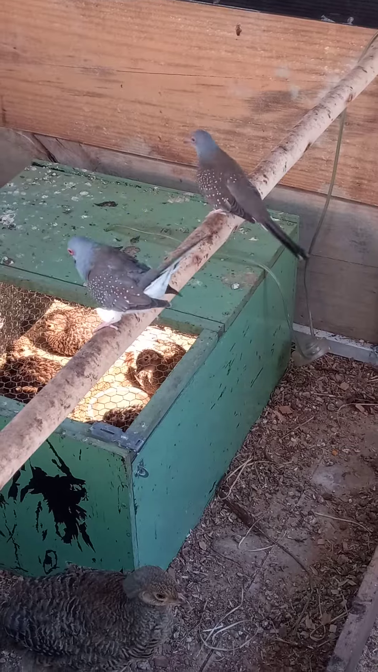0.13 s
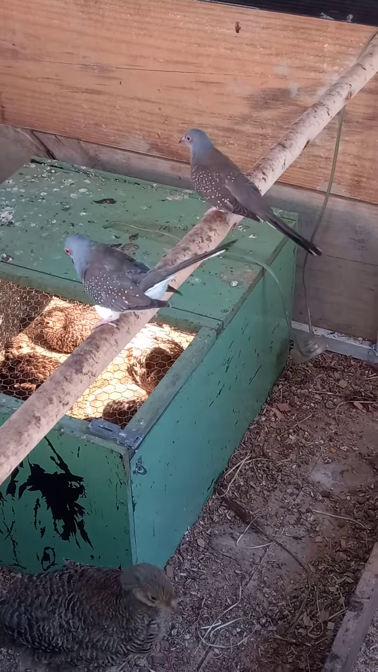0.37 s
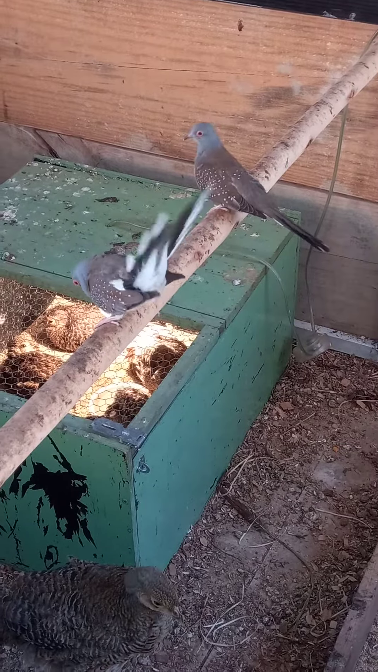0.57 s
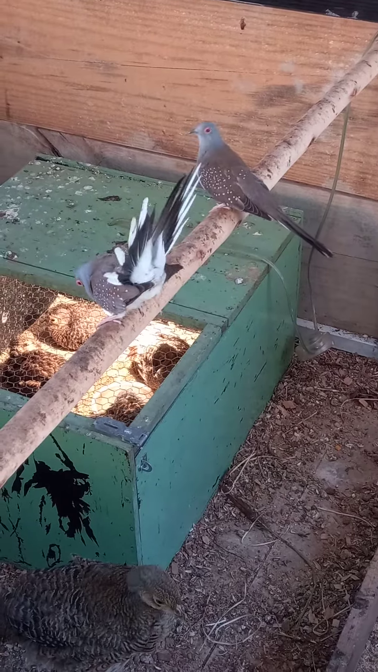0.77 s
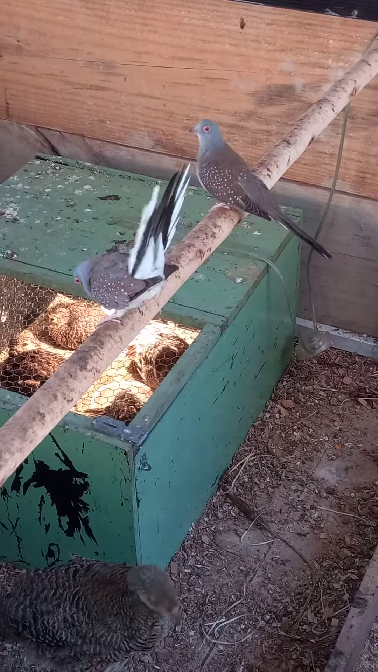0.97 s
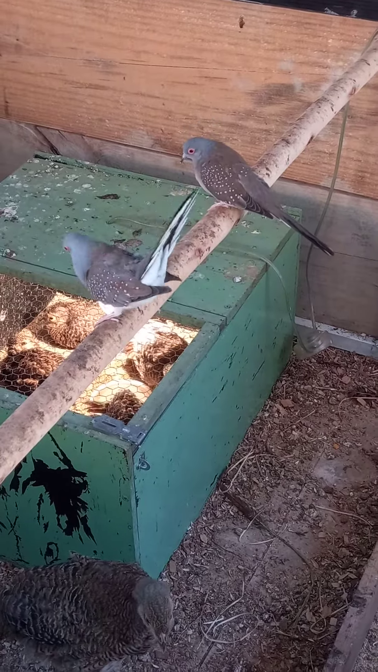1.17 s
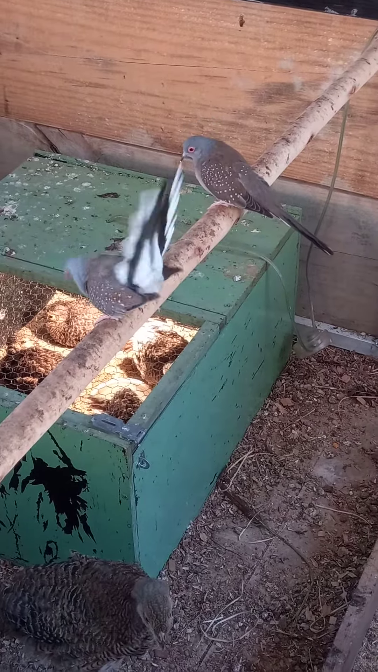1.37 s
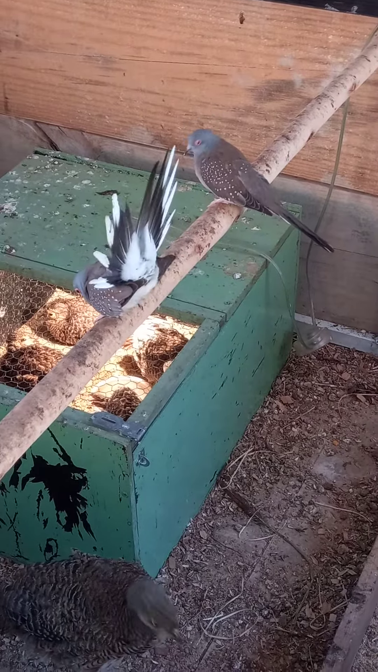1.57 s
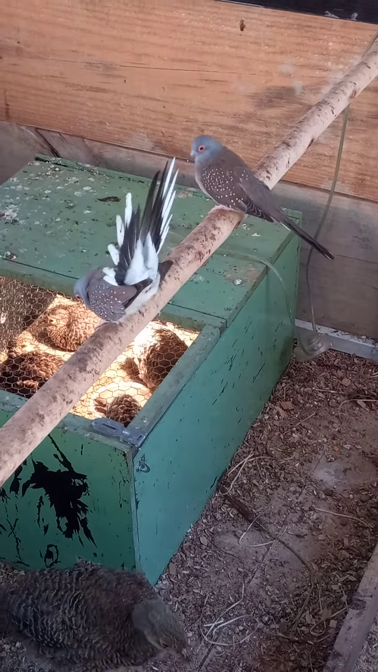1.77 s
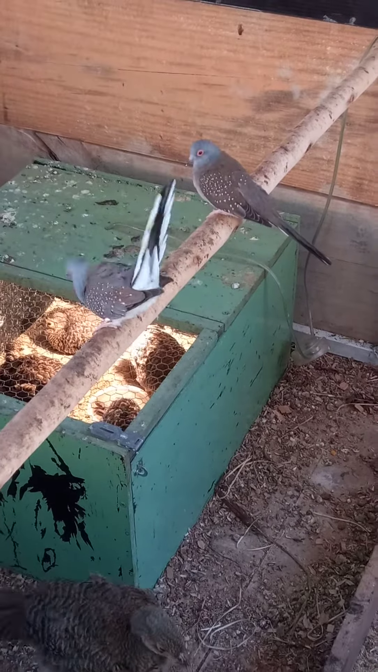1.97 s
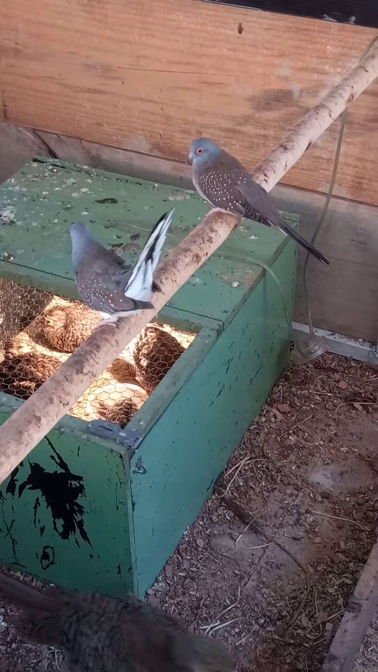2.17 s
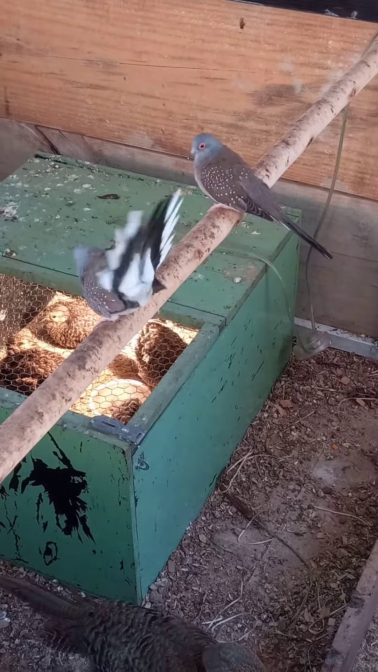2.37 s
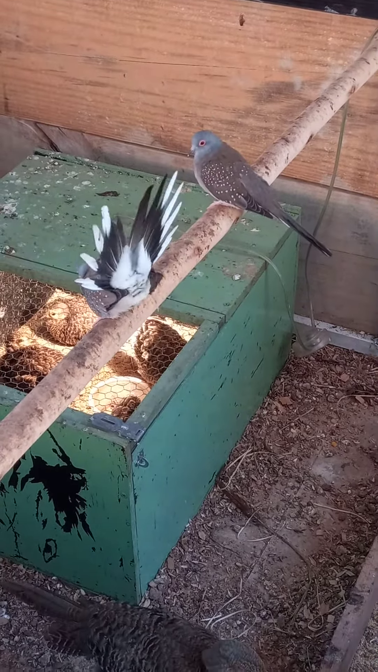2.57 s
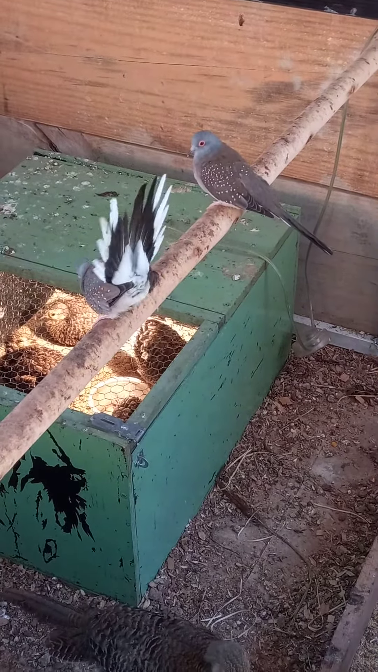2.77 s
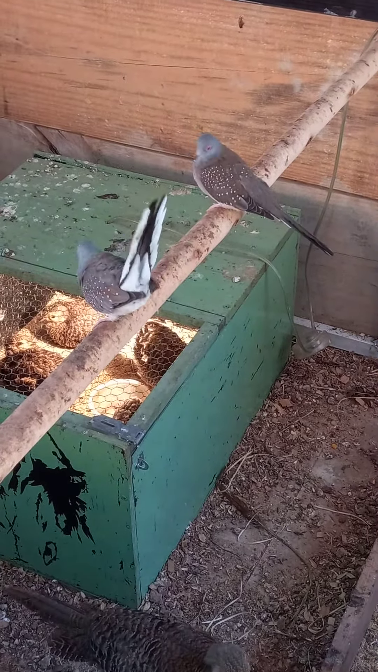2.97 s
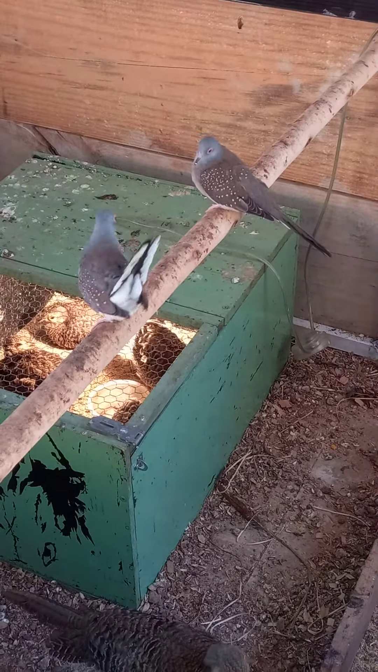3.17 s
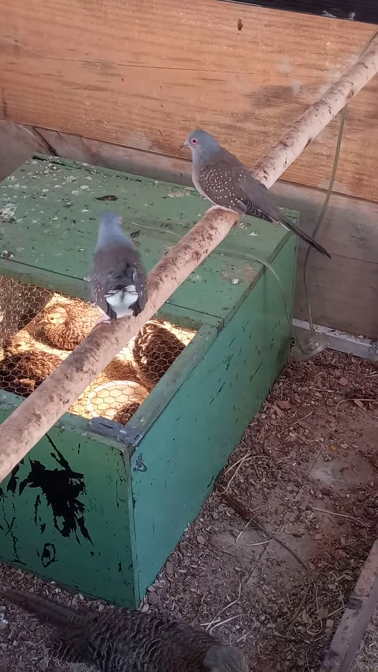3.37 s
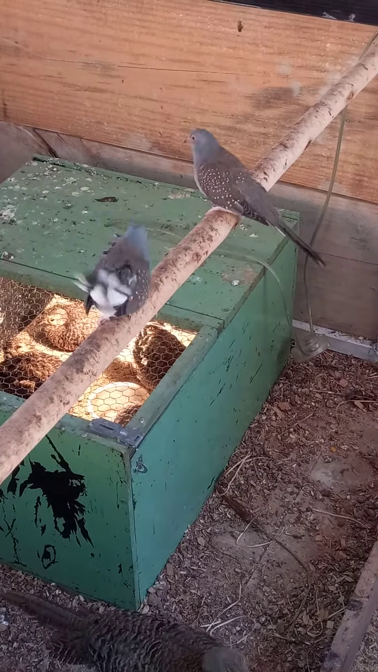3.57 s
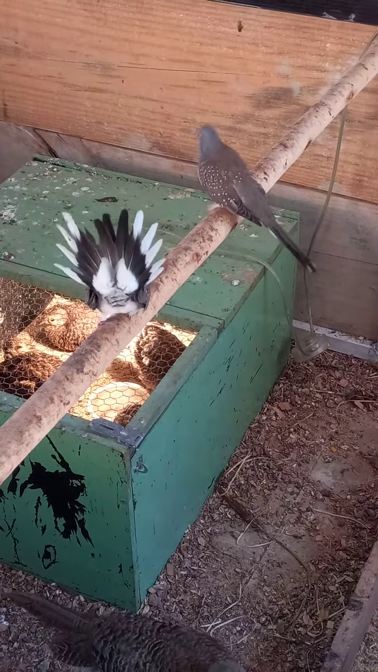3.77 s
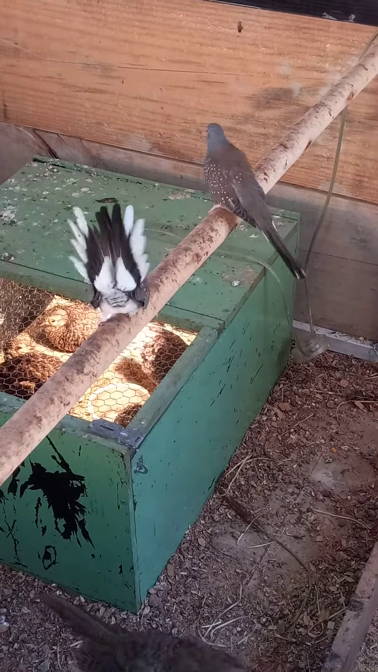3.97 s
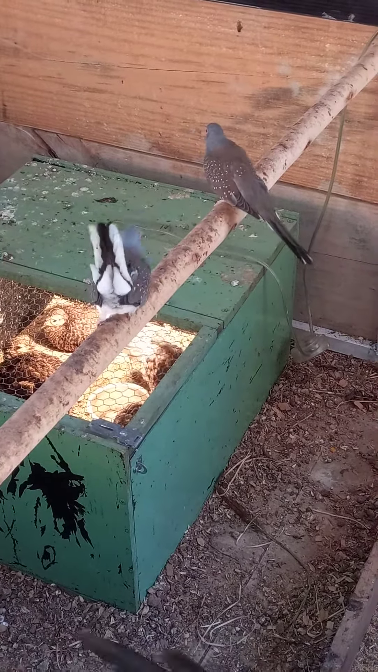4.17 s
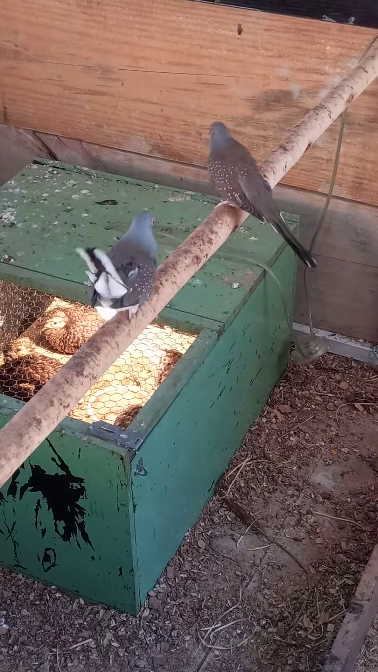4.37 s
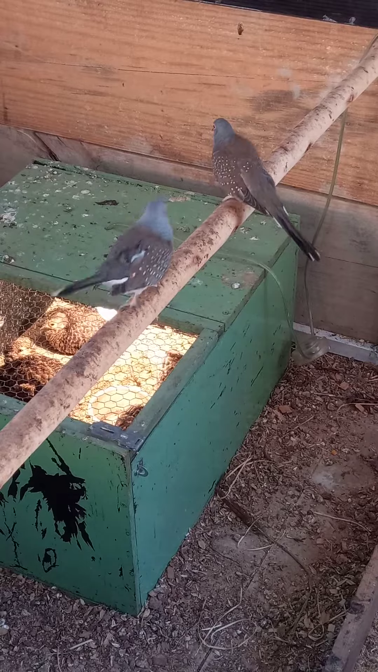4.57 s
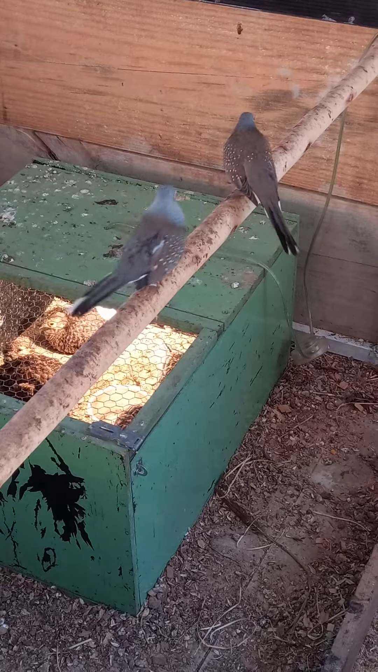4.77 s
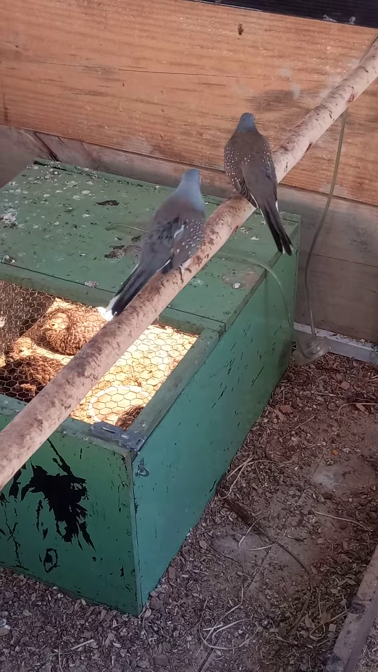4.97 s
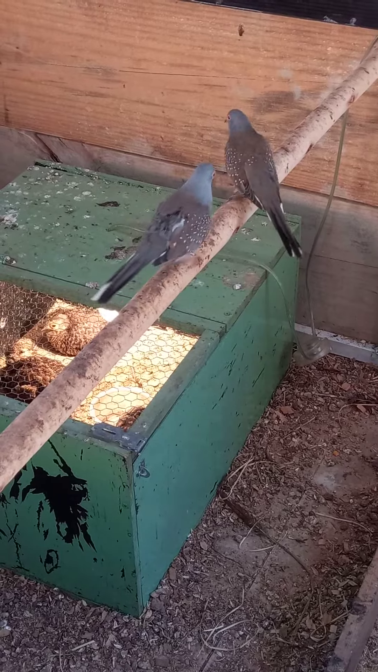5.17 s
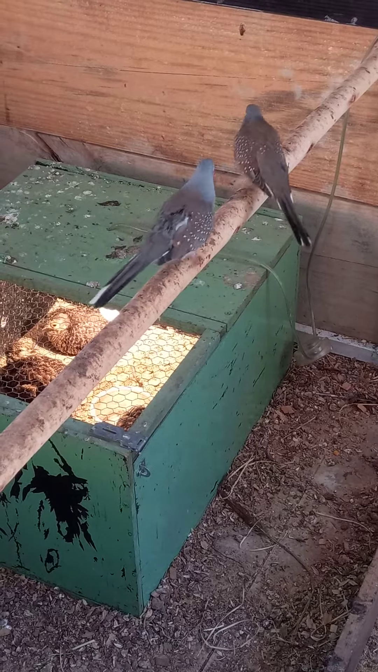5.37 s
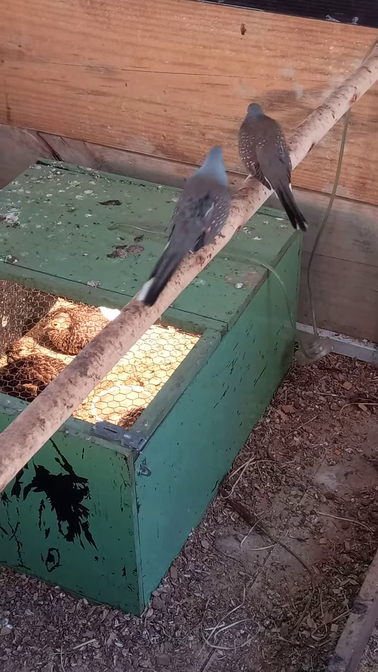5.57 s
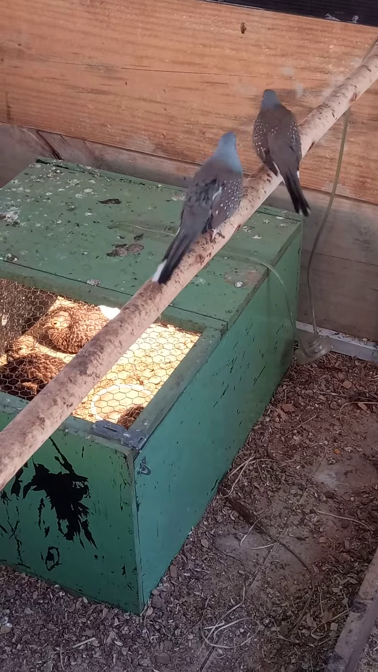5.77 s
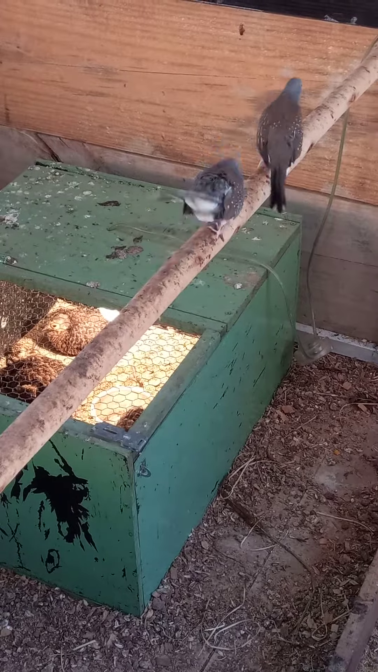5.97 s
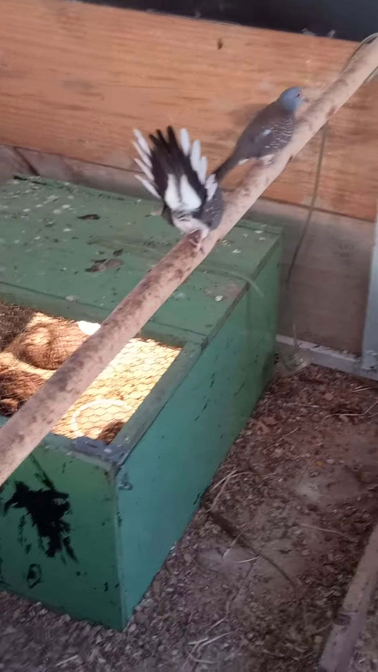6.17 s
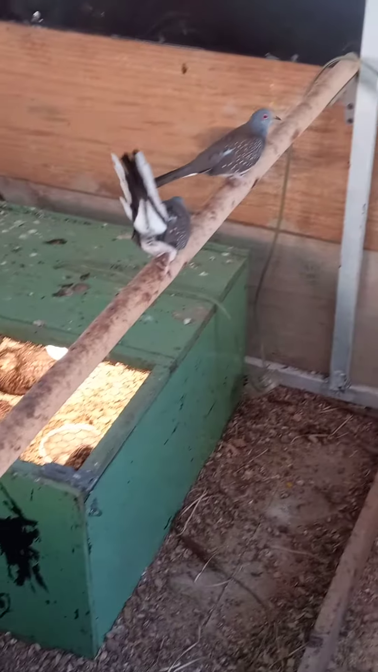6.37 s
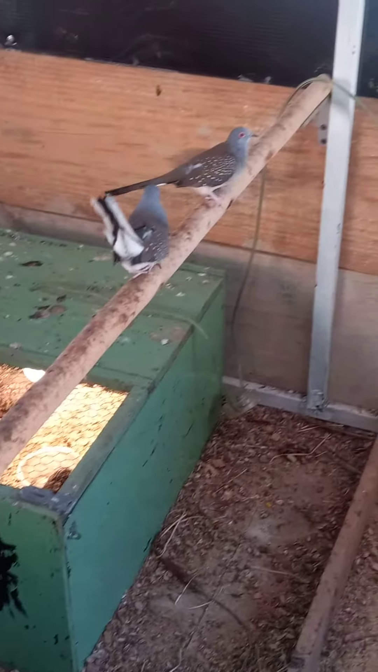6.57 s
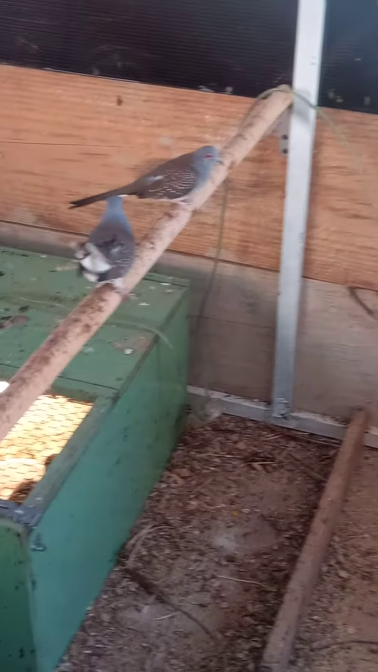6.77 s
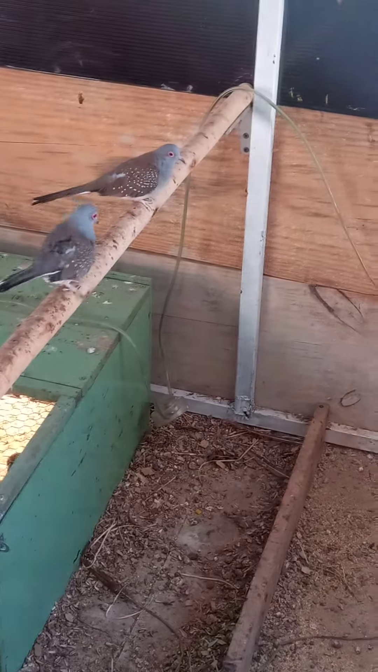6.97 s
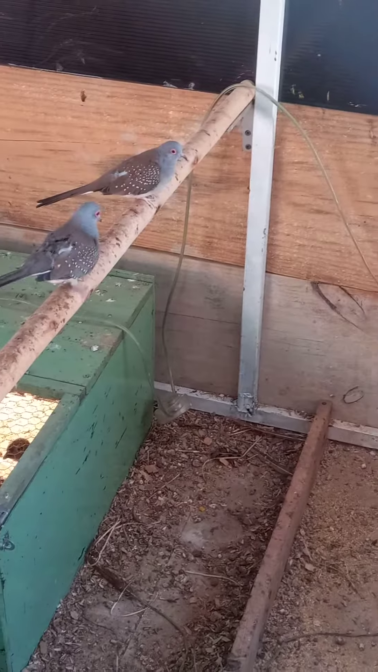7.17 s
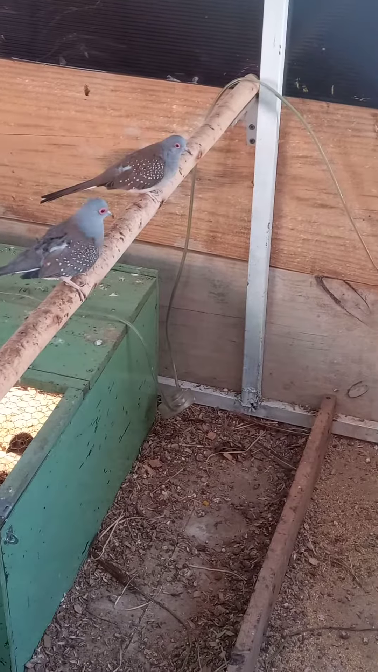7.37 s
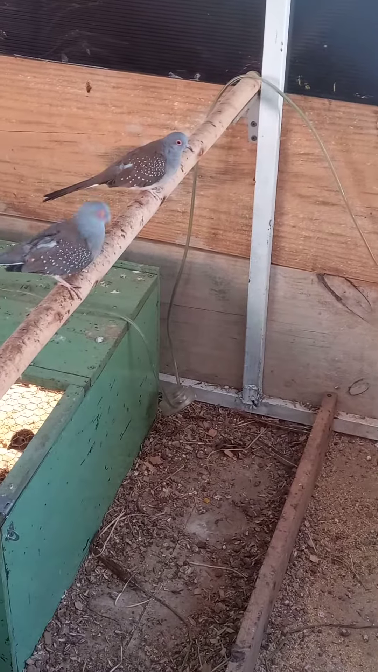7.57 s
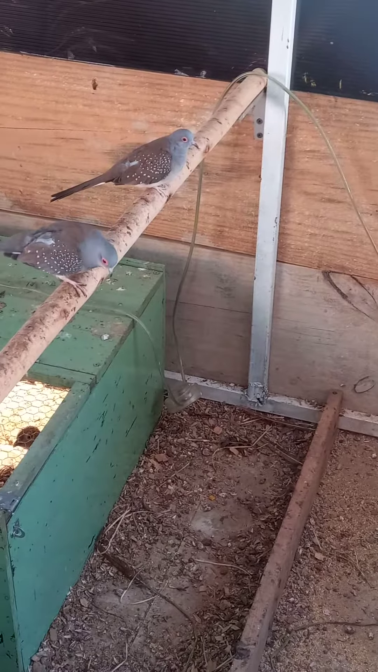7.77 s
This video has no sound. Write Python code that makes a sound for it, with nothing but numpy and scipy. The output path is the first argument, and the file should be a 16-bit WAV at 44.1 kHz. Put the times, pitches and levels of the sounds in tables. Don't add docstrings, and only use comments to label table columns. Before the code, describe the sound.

Husky low dove coos repeat steadily, pause, then return once, over feather rustles, a small peep, light perch taps and faint outdoor rumble.

```python
import sys
import numpy as np
from scipy import signal
from scipy.fft import rfft, irfft, next_fast_len
from scipy.io import wavfile
from scipy.ndimage import uniform_filter1d, map_coordinates

SR = 44100
rng = np.random.default_rng(int(sys.argv[2]) if len(sys.argv) > 2 else 0)


def invert_db(level):
    return 10 ** (np.asarray(level, dtype=float) / 20)


def wav_record(signal):
    frames = np.transpose(np.atleast_2d(signal))
    bounded = np.clip(frames, -1, 1)
    quanta = np.round(bounded * 32767).astype(np.int16)
    wavfile.write(sys.argv[1], SR, quanta)


N = 344761

# [t/s, level/dB]
EFFORT = [
    [(0, -40), (.07, -38), (.11, -44), (.135, -37.5), (.17, -36), (.235, -34), (.26, -40), (.37, -43),
     (.47, -74)],
    [(.6, -67.5), (.64, -38), (.72, -38), (.75, -45), (.81, -37), (.92, -38.5), (.96, -45), (1.2, -33),
     (1.39, -66)],
    [(1.49, -55.5), (1.52, -36.5), (1.62, -39), (1.7, -38), (1.74, -41), (1.79, -39), (1.92, -44.5),
     (2.03, -31), (2.19, -43)],
    [(2.49, -71), (2.53, -36), (2.66, -34), (2.74, -41.5), (2.8, -36.5), (2.88, -36), (2.97, -36),
     (3.08, -33), (3.16, -58)],
    [(3.735, -52), (3.765, -38), (3.87, -32.5), (3.97, -38.5), (4.04, -37), (4.15, -45), (4.18, -34),
     (4.29, -35), (4.52, -63.5)],
    [(6.03, -81.5), (6.07, -38.5), (6.2, -33.5), (6.3, -33.5), (6.4, -38.5), (6.53, -35), (6.63, -30),
     (6.75, -46), (6.84, -102)],
]
# [t/s, f/Hz]
WHISTLE = [
    [(0, 838), (.06, 836), (.14, 829)],
    [(.73, 853), (.91, 830), (1.02, 832), (1.056, 812), (1.14, 804)],
    [(1.6, 843), (1.676, 844), (1.754, 820), (1.9, 822), (1.97, 810), (2.01, 815)],
    [(2.7, 832), (2.754, 816), (2.93, 813), (3.0, 802)],
    [(3.91, 838), (3.948, 838), (4.016, 820), (4.14, 820), (4.21, 812)],
    [(6.22, 842), (6.298, 844), (6.356, 825), (6.44, 824), (6.54, 836)],
]
# [second voice f/Hz, its lead before the steady stretch level/dB, its lead after level/dB,
# its left-right level/dB, the whistle's left-right level/dB]
COO_WAYS = [(680, 9.5, 7, 1.5, -0.5), (668, -0.5, 9, 5, -0.5), (666, 7.5, 11.5, 5, -1.5),
            (672.5, 3.5, -2.5, 5, -2.5), (691.6, 7.5, 3.5, 2.5, -4), (662, 0.5, -1.5, 3, 2.5)]
# [whistle drop f/Hz, second voice waking t/s, its sag Hz/s, undertone level/dB, rattle depth 0-1]
BREAKS = [(0, .02, 40, -25, .35), (-10, .05, 110, -28, .35), (0, .05, 0, -34, .5), (40, .04, 100, -31, .25),
          (25, .04, 100, -33, .6), (60, .008, 110, -33, .45)]
# [f/Hz, level/dB]
BURR = [(450, -70.5), (610, -10), (665, 1), (760, 3.5), (850, -4), (920, -14.5), (1050, -21.5), (1300, -76)]
# [t/s, f/Hz, level/dB, second voice level/dB]
ANSWERS = [
    [(2.13, 785, -48, -56), (2.172, 752, -44.5, -55.5), (2.22, 761.4, -44.5, -48),
     (2.265, 743.4, -48.5, -51.5), (2.3, 761, -47.5, -51), (2.35, 737, -46, -62),
     (2.375, 716, -49.5, -56.5), (2.4, 710, -61, -48.5), (2.44, 697, -75, -77)],
    [(2.9, 768.5, -44.5, -79), (3.028, 772.9, -43, -55), (3.086, 777.6, -43.5, -52),
     (3.15, 753.4, -46, -60), (3.19, 767.6, -40.5, -65), (3.218, 760, -60, -71), (3.245, 757, -46.5, -67),
     (3.32, 727, -50, -61.5), (3.42, 730, -65, -60.5)],
    [(4.168, 860, -46, -60), (4.2, 887, -42, -55.5), (4.24, 865, -49.5, -55.5)],
]
# [t/s, level/dB]
FAR_COO = [(5.062, -85), (5.1, -60), (5.2, -66), (5.3, -67), (5.37, -62.5), (5.458, -59.5), (5.578, -68.5),
           (5.66, -84)]
# [t/s, length/s, start f/Hz, end f/Hz, level/dB]
PEEPS = [
    (.301, .076, 376, 372, -66),
    (2.672, .027, 2150, 1800, -40.5),
    (3.54, .04, 1600, 2150, -54),
]
# [t/s, length/s, start f/Hz, end f/Hz, level/dB]
CLEAR_CALLS = [(1.5, .098, 2323, 4200, -67), (.602, 0.051, 1870, 3720, -63.5), (1.392, 0.11, 591, 584, -64),
               (1.99, 0.2, 1540, 1476, -62), (2.16, 0.1, 1416, 1440, -73), (3.515, 0.045, 660, 698, -66),
               (.405, 0.063, 3450, 3450, -81), (.605, 0.088, 1917, 2200, -73.5),
               (2.421, 0.021, 3830, 3840, -65.5), (4.492, 0.027, 1950, 3560, -67),
               (4.81, 0.071, 478, 475, -68.5), (5.054, 0.17, 678, 610, -66), (5.5, 0.05, 2780, 3960, -77),
               (5.542, .02, 4450, 4650, -74), (5.77, 0.064, 1660, 1656, -75.5),
               (5.63, 0.023, 3080, 2500, -78), (5.645, 0.045, 2460, 1735, -62.5),
               (5.697, 0.065, 1664, 1639, -60), (6.002, 0.18, 390.6, 448, -63.5),
               (7.236, .15, 4270, 4240, -73.5)]
HUSKY_CALLS = [(2.361, .072, 2510, 4020, -74), (5.103, .053, 4940, 4850, -72),
               (5.13, .068, 4770, 3730, -76), (5.417, .053, 2150, 3720, -76.5), (5.6, .12, 4300, 4400, -79),
               (5.555, .08, 3700, 3900, -79), (5.72, .07, 5250, 5050, -74), (5.445, .04, 1150, 1450, -71),
               (5.415, .02, 2100, 2150, -72), (3.525, .04, 3700, 3600, -70), (3.585, .025, 2000, 2000, -62),
               (6.155, .08, 4390, 4050, -74), (6.55, .16, 3400, 3350, -81), (7.33, .15, 3400, 3400, -84),
               (.35, .1, 4200, 4300, -77), (6.49, .08, 4500, 4200, -78), (6.64, .07, 4600, 4400, -79),
               (.66, .06, 3600, 4300, -77), (3.455, .04, 1800, 2150, -68), (3.57, .07, 2300, 4300, -74),
               (1.465, .06, 1900, 2000, -63), (6.2, .08, 2150, 2150, -73)]
HOARSE_CALLS = [(.62, .16, 2700, 3300, -77), (1.56, .09, 3800, 3900, -73), (5.1, .07, 5000, 4900, -76),
                (4.26, .13, 1300, 1250, -59), (1.97, .2, 1250, 1200, -70), (5.61, .15, 2900, 2900, -82),
                (.522, .14, 573, 538, -60), (2.253, .13, 1480, 2100, -69), (3.672, .028, 300, 310, -55),
                (3.705, .04, 320, 360, -53), (4.013, .07, 327, 371, -61), (5.699, .12, 4910, 5000, -76),
                (7.667, .11, 1860, 2150, -74), (5.44, .07, 520, 520, -68)]
# [t/s, peak level/dB, thump level/dB]
KNOCKS = [
    (2.9751, -34, -34),
    (3.038, -37, 1),
    (4.5174, -72, 6),
]
# [f/Hz, level/dB, t60/s]
PERCH = [(87.6, -41, 0.075), (139.3, -15, .08), (274, 21.5, 0.023), (516, -2, 0.034), (930, 16.5, 0.016),
         (1620, 1.5, .025), (2173, 3.5, 0.03)]
# [t/s, peak level/dB]
PECKS = [(4.1842, -71), (4.471, -77), (6.334, -63.5), (6.6253, -58), (6.8947, -62.5), (7.1866, -58.5),
         (7.444, -71.5), (7.7202, -66)]
# [f/Hz, level/dB, t60/s]
MESH = [(4450, 1.5, 0.41), (4930, 0.5, 0.18), (6170, 3, 0.2), (6800, -5.5, 0.15), (7500, -13.5, 0.11)]
# [t/s, peak level/dB]
TICKS = [(0.8912, -67.5), (1.9978, -64.5), (2.613, -53), (2.6197, -48.5), (2.633, -51.5), (2.8135, -60.5),
         (2.862, -53), (2.8674, -53), (2.8763, -49.5), (2.885, -45), (2.942, -52), (2.979, -49.5),
         (3.0203, -52), (3.0367, -46.5), (3.0502, -54), (3.192, -66), (3.21, -64.5), (3.9752, -63),
         (4.1861, -64.5), (4.4717, -59), (4.4749, -62), (4.4785, -65.5), (4.5195, -62), (4.6275, -60),
         (4.6405, -60.5), (7.1849, -64.5)]
# [f/Hz, level/dB]
SNAP = [(800, -25), (2000, -0.5), (4000, -6.5), (6500, 3.5), (8000, -9.5), (15000, -4.5)]
# [t/s, level/dB, rise/s, fall/s, brightness/dB]
SHAKES = [(0, -59, 0.019, 0.0089, -3.5), (.33, -72.5, 0.57, 0.14, -17), (.642, -71.5, 0.18, 0.63, -12.5),
          (1.13, -66, 0.096, 0.23, -18), (1.4, -69.5, 0.0048, 0.23, -9.5), (1.492, -54.5, 0.097, 0.19, -21),
          (1.758, -65.5, .12, 0.21, -8.5), (2.05, -73, 0.17, 1, -9), (2.616, -53.5, 0.0045, 0.18, -6),
          (2.7, -56, 0.17, 0.127, -17), (2.865, -64, 0.0053, 0.6, -3.5), (2.885, -60.5, 0.037, 0.064, 2),
          (2.945, -61.5, 0.0087, 0.025, -2.5), (2.82, -69.5, .04, 0.037, 0), (4.18, -72, .03, 0.13, -16.5),
          (3.02, -63.5, .02, 0.072, 0), (3.04, -64, 0.67, 0.2, -8), (3.47, -64.5, 0.038, 0.56, -6.5),
          (3.72, -61, 0.29, 0.24, -16), (4.05, -65.5, 0.13, 0.18, -20), (6.66, -68, 0.13, 0.42, -10.5),
          (7.21, -79.5, .1, 0.38, -4.5), (7.74, -78, 0.46, 0.55, -12.5), (5.27, -74, 0.36, 1, -7),
          (6.19, -62.5, 0.096, 0.2, -16), (6.37, -69, 0.072, 0.38, -6.5)]
FAR_SHAKES = [(4.264, -54.5, 0.013, 0.21, -11), (4.293, -49, 0.044, .18, -20),
              (4.635, -60, 0.011, 0.27, -7.5), (4.67, -52.5, 0.037, 0.16, -13)]
# [f/Hz, level/dB]
STRAW = [(900, -31.5), (1150, -10), (1500, -11), (2000, -5.5), (2350, -11), (2800, -21), (3400, -48)]
FAR_STRAW = [(900, -33), (1300, -13.5), (1600, -8.5), (2000, -2), (2350, -9), (2800, -12), (3400, -37.5)]
FEATHER = [(2500, -23.5), (3000, 0), (4200, -0.5), (4900, 0), (5400, -13.5), (6000, -37.5)]
GRIT = [(4600, -24.5), (5300, -5), (6800, -1), (7200, -12.5), (7700, -25)]
WING = [(6500, -24), (7500, -3.5), (9000, -1), (12000, -2), (15500, -1)]
# [t/s, level/dB, rise/s, fall/s]
TWITTER = [(.38, -75, 1, .4), (.53, -66, .1, .2), (.72, -66, 0.19, 0.19), (1.58, -70, 0.065, 0.22),
           (1.75, -83, 0.09, 0.33), (2.45, -79.5, 0.17, 0.076), (3.49, -69.5, 0.018, 0.31),
           (5.3, -81.5, 0.68, 0.09), (6.4, -67, 0.11, 0.22), (6.53, -64.5, 0.15, 0.25),
           (6.66, -69, .1, 0.44), (7.32, -74, 0.33, 0.65)]
# [f/Hz, level/dB]
FLOCK = [(2900, -34.5), (3350, -9), (3900, -2), (4500, -1), (4750, -7), (5000, -41)]
# [t/s, boom level/dB, rise/s, fall/s, boxiness/dB]
BUMPS = [(1.402, -58.5, .01, .06, 2), (1.18, -65, 0.069, 0.15, -0.5), (1.49, -43.5, 0.076, 0.14, -5),
         (1.55, -54, 0.082, 0.083, 7.5), (1.61, -54.5, .04, 0.042, -0.5), (1.73, -50.5, 0.066, 0.15, -2),
         (1.8, -50.5, 0.042, 0.14, -6.5), (2.9, -57, 0.47, 0.22, -3.5), (3.06, -37, 0.11, 0.1, -3.5),
         (3.68, -56, 0.045, 0.25, 3.5), (2.875, -54.5, 0.017, .1, 2.5), (4.01, -63, 0.027, 0.37, 9),
         (2.03, -55, 0.065, 0.13, -6.5), (4.85, -58, 0.057, 0.049, -14), (7.24, -63.5, .1, 0.16, -18.5),
         (1.1, -66, 0.074, 0.17, 6), (.3, -72.5, 0.15, 0.18, 6.5), (4.31, -57, .12, 0.077, 10),
         (4.51, -49.5, .2, 0.09, -10.5),  (6.09, -61, 0.14, 0.41, -3.5), (6.38, -52, 0.13, .35, -9),
         (6.81, -56.5, 0.1, 0.04, -12)]
# [t/s, level/dB]
DRONE = [(0, -64), (.5, -71.5), (1.1, -64), (3.7, -63.5), (4.7, -68.5), (5.7, -64.5), (6.9, -72),
         (7.82, -72)]
# [f/Hz, level/dB]
BOOM = [(15, -62), (25, -29), (67, -5.5), (81, 4.5), (118, -0.5), (161, -7), (290, -38), (480, -120)]
BOX = [(150, -29), (200, -2), (330, -2.5), (450, -4.5), (700, -5.5), (1100, -11.5), (1500, -47.5)]
# [t/s, f/Hz, level/dB]
ENGINE = [
    [(4.18, 112.2, -64.5), (4.286, 110.8, -51.5), (4.496, 111.6, -46.5), (4.62, 107, -67.5)],
    [(5.25, 102.7, -64), (5.328, 109, -65.5), (5.608, 112.3, -56), (5.96, 132.9, -65), (6.1, 131, -66)],
]
# [f/Hz, t60/s]
SHED = [(200, 0.22), (800, 0.35), (2000, 0.24), (10000, 0.15)]
# [f/Hz, likeness 0-1]
ALIKE = [(60, 0.93), (500, 0.69), (900, 0.18), (1400, 0.034), (15000, 0.02)]
# [f/Hz, level/dB]
PORTS = [(60, -4), (900, -2.5), (1500, -12), (2250, -14.5), (2900, 2), (4500, -2), (6600, 25.5),
         (13000, 4.5)]
# [f/Hz, level/dB]
HISS = [(4410, -33), (7500, -11), (9200, -9), (12500, -0.5), (15500, -5.5)]


def unit(x):
    return x / np.sqrt(np.mean(x ** 2) + 1e-20)


def along(points, hz):
    f, v = np.transpose(points)
    return np.interp(np.log(hz + 1), np.log(f + 1), v)


def curves(rows):
    s, *cols = np.transpose(rows)
    t = np.arange(N) / SR
    fade_in = np.clip((t - s[0]) / 0.013 + (s[0] < .02), 0, 1)
    fade_out = np.clip((s[-1] - t) / 0.014, 0, 1)
    return [np.interp(t, s, c) for c in cols] + [fade_in * fade_out]


def wobble(rate):
    knots = rng.standard_normal(int(N * rate / SR) + 4)
    return map_coordinates(knots, [np.arange(N) * rate / SR])


def tone(hz):
    return np.sqrt(2) * np.sin(2 * np.pi * np.cumsum(hz) / SR)


def filtered(x, response):
    m = next_fast_len(N + SR // 2)
    return irfft(rfft(x, m) * response(np.fft.rfftfreq(m, 1 / SR)), m)[..., :N]


def rush(spectrum, patchy_db):
    z = signal.stft(rng.standard_normal((2, N)), nperseg=512)[2]
    field = uniform_filter1d(rng.standard_normal(z.shape[1:]), size=6, axis=0)
    field = uniform_filter1d(field, size=10, axis=1)
    pair = signal.istft(z * invert_db(patchy_db * unit(field)), nperseg=512)[1][:, :N]

    def mid_side(hz):
        turn = np.arccos(np.clip(along(ALIKE, hz), -1, 1)) / 2
        return invert_db(along(spectrum, hz)) * [np.cos(turn), np.sin(turn)]

    mid, side = filtered(pair, mid_side)
    return unit(mid + side * [[1], [-1]])


def swells(rows, floor_db, gain_db=0, grows=0):
    t = np.arange(0, N + 32, 32) / SR
    power = invert_db(2 * floor_db)
    for s, db, rise, fall, *tilt_db in rows:
        away = np.maximum((s - t) / max(rise, .003), (t - s) / max(fall, .01))
        level_db = db + gain_db + grows * sum(tilt_db) - 20 * away
        power = power + invert_db(2 * level_db)
    return np.interp(np.arange(N) / SR, t, np.sqrt(power))


def dove():
    out = np.zeros((2, N))
    flutter = burr()
    breath = rush([(500, -38.5), (650, 0.5), (1000, 2), (1300, -33)], patchy_db=2)
    for effort, whistle, ways, breaking in zip(EFFORT, WHISTLE, COO_WAYS, BREAKS):
        out += coo(effort, whistle, ways, breaking, flutter, breath)
    return out


def coo(effort, whistle, ways, breaking, flutter, breath):
    scoop_hz_per_s, drop_s = 150, 0.043
    hush_db, hush_db_per_s = 37, 330
    tire_s, tire_db_per_s = 0.23, 74
    low_hz, before_db, after_db, pan_db, whistle_pan_db = ways
    drop_hz, wake_s, sag, under_db, depth = breaking
    t = np.arange(N) / SR
    effort_db, gate = curves(effort)
    steady, breaks = whistle[0][0], whistle[-1][0]
    unsettled = (steady - t) / .04
    broken = (t - breaks + wake_s / 2) / (.008 + wake_s / 2)
    rough = np.clip(np.maximum(unsettled, broken), 0, 1)

    scoop_hz = scoop_hz_per_s * (steady - t).clip(0, 1)
    high_hz = curves(whistle)[0] - scoop_hz - drop_hz * ((t - breaks) / drop_s).clip(0, 1)
    low_hz = low_hz - sag * (t - breaks - .05).clip(0, 1)
    gap_hz = high_hz - low_hz + 9 * wobble(40)
    high_hz = high_hz + rough * 17 * wobble(75) + 2.5 * wobble(20)
    low_hz = low_hz + 10 * wobble(55)

    falling_db = (t - steady) * hush_db_per_s + hush_db * (steady == 0)
    waking_db = (breaks + 0.0086 - t) * hush_db / max(wake_s, .005)
    hushed_db = np.minimum(falling_db, waking_db).clip(0, hush_db)
    tired_db = tire_db_per_s * (t - breaks - tire_s).clip(0, 1)
    lead_db = np.where(t < (steady + breaks) / 2, before_db, after_db) - hushed_db - tired_db
    share = 1 / np.sqrt(1 + invert_db(2 * lead_db))

    high = tone(high_hz) * invert_db((.4 + rough * 2.2) * wobble(40) - 1.5 * rough)
    low = tone(low_hz) * invert_db(2.2 * wobble(45) - 2.2)
    bands = invert_db(under_db) * tone(low_hz - gap_hz)
    bands = bands + invert_db(-24.5) * tone(high_hz + gap_hz + 25 * wobble(80))
    flutter_db = -9 + 6 * depth + 25 * (t - breaks).clip(0, .25)
    low = invert_db(lead_db) * (low + rough * bands + invert_db(flutter_db) * flutter)
    high = high + invert_db(-33) * breath

    high = high * invert_db([[whistle_pan_db / 2], [-whistle_pan_db / 2]])
    low = low * invert_db([[pan_db / 2], [-pan_db / 2]])
    voice = invert_db(effort_db) * share * (high + low)
    choke = np.clip(.9 - 9 * wake_s, 0, 1) * np.exp(-((t - breaks) / .007 - 1) ** 2)
    lump_depth = rough * np.where(t < breaks - .1, .8, 1) * depth
    return gate * voice * (1 - choke) * rattle(lump_depth)


def burr():
    noise = filtered(rng.standard_normal(N), lambda hz: invert_db(along(BURR, hz)))
    return unit(noise * invert_db(0.72 * wobble(45)))


def rattle(depth):
    lumps = np.abs(tone(30 / 2 * (1 + .35 * wobble(15))))
    return 1 + depth * (lumps * invert_db(1.2 * wobble(30)) - 1)


def answers():
    out = np.zeros(N)
    gap_hz = 105
    for rows in ANSWERS:
        hz, db, low_db, gate = curves(rows)
        voice = tone(hz + 7 * wobble(50)) + invert_db(-8) * burr()
        voice = voice + invert_db(-21) * tone(1.7 * hz + 170 * wobble(200))
        out += gate * invert_db(db + 2 * wobble(35) - 1.0) * voice
        second = tone(hz - gap_hz + 14 * wobble(45))
        out += gate * invert_db(low_db + 2.7 * wobble(40) - 4.5) * second
    db, gate = curves(FAR_COO)
    return out + gate * invert_db(db) * burr() * rattle(0.54)


def glides(table, shake):
    out, breath = np.zeros(N), wobble(320)
    for s, length, start_hz, end_hz, db in table:
        u = np.linspace(0, 1, round(length * SR))
        at = round(s * SR)
        swell = np.sqrt(np.sin(np.pi * np.sqrt(u)).clip(0))
        hz = start_hz * (end_hz / start_hz) ** u
        hz = hz * (1 + shake / 100 * breath[at:][:len(u)])
        out[at:][:len(u)] += invert_db(db) * swell * tone(hz)
    return out * invert_db(1.5 * wobble(60))


def rings(events, modes, crack, size, blur):
    out, t = np.zeros(N + SR), np.arange(SR // 2) / SR
    for s, db, *low_db in events:
        ring = np.zeros(len(t))
        for hz, level, t60 in modes:
            thump_db = (hz < 600) * sum(low_db)
            decay = invert_db(level + rng.normal(0, 3.2) + thump_db - 60 * t / t60)
            drift = np.cumsum(rng.normal(0, blur, len(t)))
            ring += decay * np.sin(2 * np.pi * hz * t + drift)
        snap = crack * invert_db(-60 * t / 0.013) * uniform_filter1d(rng.standard_normal(len(t)), size)
        onset = 1 - np.exp(-t / 0.0012)
        out[round(s * SR):][:len(t)] += invert_db(db) * (ring * onset + snap)
    return out[:N]


def perch_knocks():
    return invert_db(-10.0) * rings(KNOCKS, PERCH, crack=2.8, size=18, blur=1.5e-5)


def mesh_pecks():
    return invert_db(-11.5) * rings(PECKS, MESH, crack=.8, size=3, blur=.16)


def ticks():
    out, t = np.zeros((2, N + SR)), np.arange(SR // 40) / SR
    bursts = filtered(rng.standard_normal((2, N)), lambda hz: invert_db(along(SNAP, hz)))
    decay = invert_db(-60 * t / 0.0046) + 0.19 * invert_db(-60 * t / 0.054)
    for s, db in TICKS:
        out[:, round(s * SR):][:, :len(t)] += invert_db(db - 3.5) * decay
    return out[:, :N] * unit(bursts)


def rustle():
    shakes, crackle = SHAKES + FAR_SHAKES, wobble(260)
    straw = swells(SHAKES, -82.5) * rush(STRAW, patchy_db=2.0)
    straw = straw + swells(FAR_SHAKES, -120) * rush(FAR_STRAW, patchy_db=2.0)
    straw = straw * invert_db(1.5 * crackle + 1.5 * wobble(70))

    fluff = swells(shakes, -93.5, gain_db=-4.5, grows=0.58)
    feather = fluff * invert_db(0.5 * crackle) * rush(FEATHER, patchy_db=-0.3)

    scrape = swells(shakes, -93.0, gain_db=-3.0, grows=0.94)
    grit = scrape * invert_db(0.97 * crackle) * rush(GRIT, patchy_db=2.2)

    near_quills = swells(SHAKES, -104, gain_db=-4.5, grows=1.7)
    far_quills = invert_db(-34) * swells(FAR_SHAKES, -120, grows=0.99)
    wing = np.hypot(near_quills, far_quills) * invert_db(2.4 * crackle) * rush(WING, patchy_db=2.5)
    return straw + feather + grit + wing


def twitter():
    return swells(TWITTER, -110) * rush(FLOCK, patchy_db=3.0)


def traffic():
    drone = invert_db(curves(DRONE)[0])
    boom = np.hypot(drone, swells(BUMPS, -92.5))
    box = np.hypot(drone * invert_db(-7), swells(BUMPS, -86.0, grows=0.9))
    out = boom * invert_db(0.35 * wobble(7.9)) * rush(BOOM, patchy_db=2.0)
    out = out + box * invert_db(1.1 * wobble(29)) * rush(BOX, patchy_db=1.0)
    for rows in ENGINE:
        hz, db, gate = curves(rows)
        out += gate * invert_db(db) * (tone(hz) + invert_db(-19) * tone(2 * hz))
    return out


def shed(x):
    hz, t, z = signal.stft(rng.standard_normal((2, SR // 2)), SR, nperseg=256)
    decay = invert_db(-60 * t / along(SHED, hz)[:, None])
    tail = signal.istft(z * decay, SR, nperseg=256)[1]
    late = np.pad(x, (200, 0))[None]
    return signal.fftconvolve(late, tail / np.linalg.norm(tail[0]), axes=1)[:, :N]


def scene():
    near, others, peeps = dove(), answers(), glides(PEEPS, shake=0.65)
    far = glides(CLEAR_CALLS, shake=2.0) + glides(HUSKY_CALLS, shake=4.3) + glides(HOARSE_CALLS, shake=6.5)
    knocks, pecks = perch_knocks(), mesh_pecks()
    doves = near + others
    doves = np.array([doves[0], np.roll(doves[1], 2)])
    sent = invert_db(-13) * near.mean(axis=0) + invert_db(-9) * others
    sent = sent + invert_db(-7) * peeps + invert_db(2.5) * far + invert_db(-4.5) * knocks + invert_db(3.5) * pecks
    direct = doves + peeps + invert_db(-0.5) * far + knocks + pecks + ticks()
    return direct + shed(sent) + invert_db(2.5) * (rustle() + twitter()) + traffic()


def top_cut(x):
    return signal.sosfilt(signal.butter(12, 15680, fs=SR, output="sos"), x)


def record(dry):
    def port_gain(hz):
        tilt_db = along(PORTS, hz)
        return invert_db(tilt_db / 2 * [[1], [-1]]) / np.cosh(tilt_db * np.log(10) / 40)

    hiss = invert_db(-86.5) * rush(HISS, patchy_db=3.0)
    mix = filtered(filtered(dry, port_gain) + hiss, lambda hz: hz < 15680)
    return top_cut(mix)


dry = scene()
out = record(dry)
wav_record(out)
```